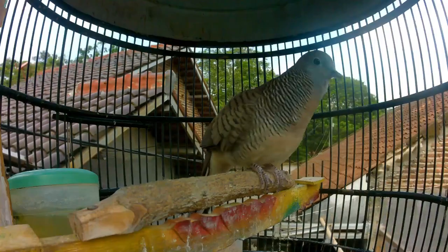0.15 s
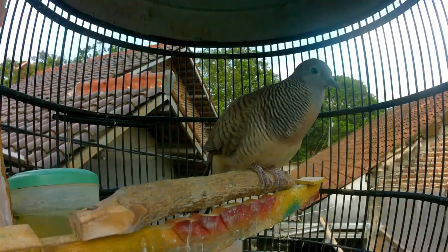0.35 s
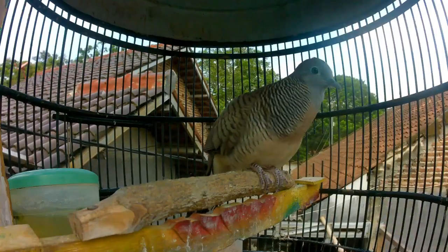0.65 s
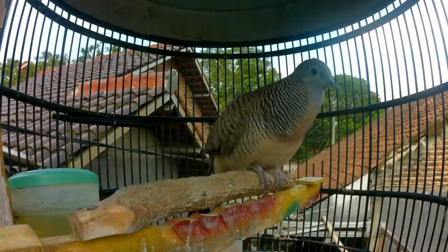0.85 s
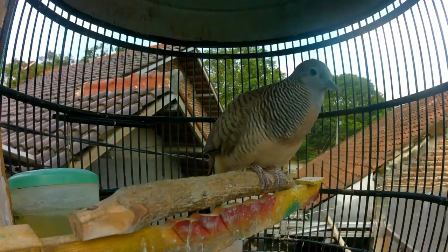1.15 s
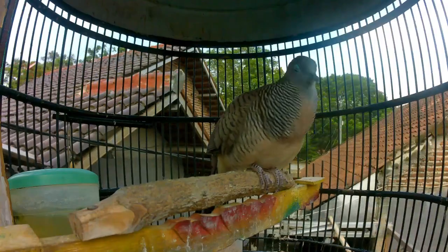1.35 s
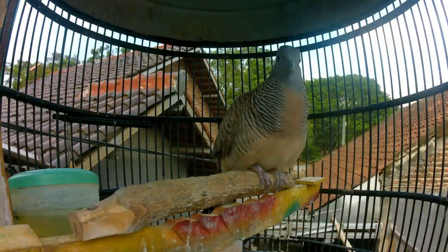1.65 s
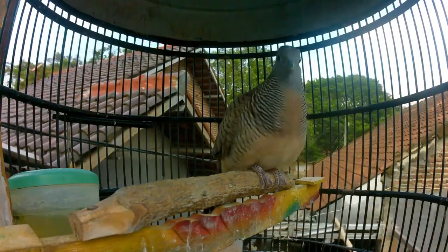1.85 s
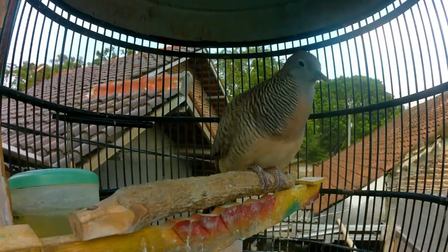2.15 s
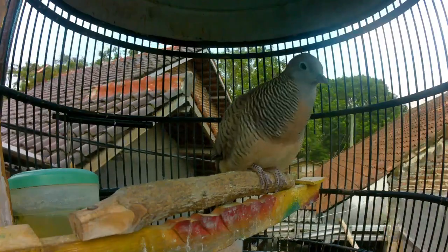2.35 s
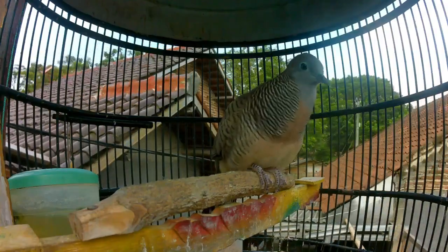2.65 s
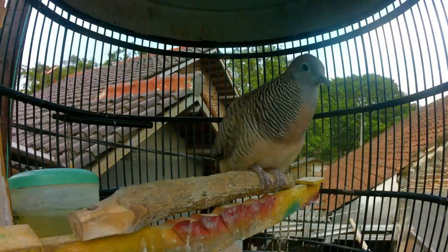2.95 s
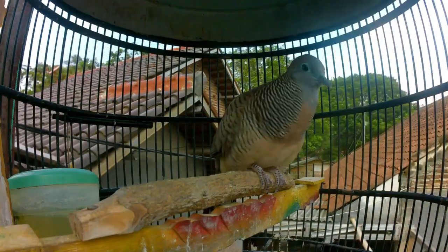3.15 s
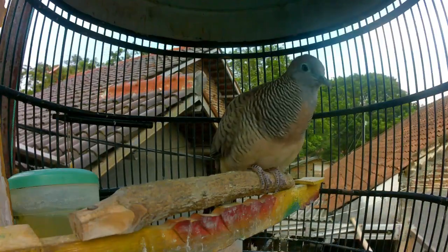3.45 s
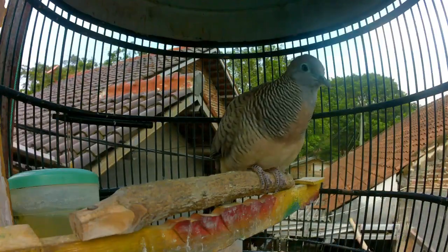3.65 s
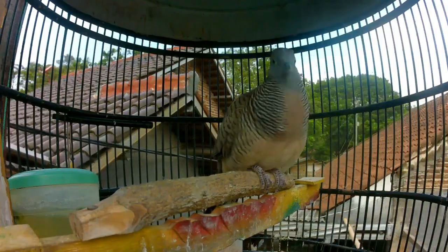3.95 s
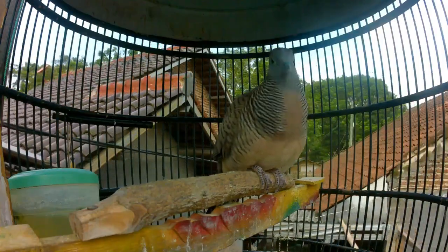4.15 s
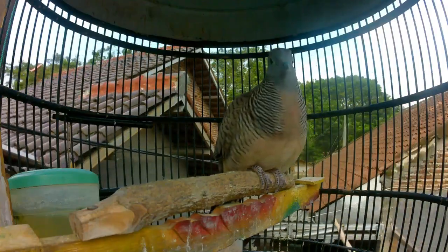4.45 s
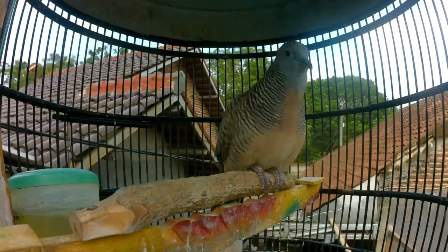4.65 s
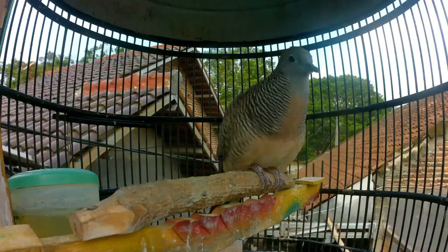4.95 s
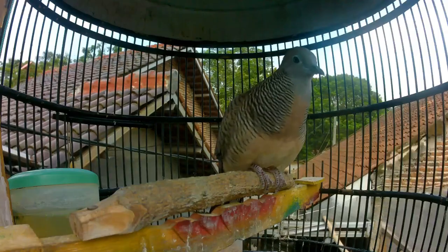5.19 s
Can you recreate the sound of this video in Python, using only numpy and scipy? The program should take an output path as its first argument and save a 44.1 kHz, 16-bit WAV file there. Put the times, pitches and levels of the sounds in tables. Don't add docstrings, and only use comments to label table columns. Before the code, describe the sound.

A small dove coos close to a camera microphone in an open-air cage among roofs. Its voice is a nearly pure, hollow, medium-high whistle, each note sliding quickly upward and rounding off, with a little breathy roughness and soft throat ticks at the onset. At 0.2 seconds the first phrase opens with a rippling trilled note, followed by four rapid staccato pips, then two longer coos, ending near 1.1. After a pause of about a second, a second phrase starts at 2.2: trill, three pips, a shorter coo and two held ones, ending near 3.1. Nearly two seconds of quiet follow. At 4.9 a third phrase begins with its trill and three quick pips, and a final coo is cut short at about 5.3. Very faint, tight echoes trail the notes. Throughout, a low distant motor hum, a thin wavering whine, soft town rumble and slight hiss stay steady underneath.

```python
import sys
import numpy as np
from scipy import signal
from scipy.fft import rfft, irfft
from scipy.io import wavfile

SR = 44100
rng = np.random.default_rng(int(sys.argv[2]) if len(sys.argv) > 2 else 0)


def to_wav(s):
    ch = np.atleast_2d(s).T
    pcm = np.round(np.clip(ch, -1, 1) * 32767)
    wavfile.write(sys.argv[1], SR, pcm.astype(np.int16))


def field_ratio(decibels):
    return 10 ** (np.asarray(decibels, dtype=float) / 20)


N = 234682

# start t/s, upward glide t/s, length t/s, top pitch f/Hz, attack effort level/dB
OPENING_NOTES = [
    (0.2368, 0.05, 0.15, 1357, -12.5),
    (2.167, 0.04, 0.14, 1333, -13),
    (4.9118, .0401, .1352, 1340, -12),
]
STACCATO_NOTES = [
    (0.388, 0.0082, 0.039, 1258, -16),
    (0.4412, 0.01, 0.0363, 1220, -15),
    (0.529, 0.014, 0.0445, 1240, -12),
    (0.6199, 0.02, .0538, 1279, -10.5),
    (2.3034, 0.012, 0.047, 1256, -14),
    (2.3905, 0.012, 0.039, 1225.0, -14),
    (2.4763, .017, .0498, 1270, -12.5),
    (5.0458, 0.0085, 0.045, 1280, -15.5),
    (5.0957, 0.0072, 0.037, 1233, -14),
    (5.1924, 0.013, .0454, 1265, -11),
]
HELD_NOTES = [
    (0.7239, 0.022, 0.11, 1331, -12.5),
    (0.9491, 0.03, 0.11, 1310, -13),
    (2.5708, 0.018, 0.075, 1322, -13),
    (2.718, 0.021, 0.12, 1320, -12.5),
    (2.9486, .030, 0.1234, 1291, -13.5),
    (5.288, 0.015, 0.049, 1308, -10.5),
]
# t/s after glide, depth f/Hz, effort change level/dB
TRILL_DIPS = [
    (.030, 75.0, -4.0),
    (.062, 102.0, -4.0),
    (.093, 65.0, -4.0),
]

# start f/Hz, bend f/Hz, bend share of glide, knee f/Hz, scoop below start f/Hz
GLIDE_LAWS = [(931, 1050, .83, 1257, 400), (660, 973, .38, 1169, 7.9), (621.7, 990, .54, 1205, 13)]
# top share of arch, end f/Hz, fade level/dB, release t/s
ARCH_LAWS = [(.26, 1271, -1.9, 0.0022), (0.12, 1070, -7, 0.0047), (0.46, 1140, -5.5, 0.0048)]
# onset level/dB, share of glide to full effort, settling t/s, greatest accent level/dB over held
ATTACK_LAWS = [(-14, 0.56, .0029, 3), (-7.1, 0.36, 0.0091, 11.0), (-22, 0.21, 0.0048, 4)]
SECOND_DB = (-2, 7.5, 4.5)
GLIDE_SECOND_DB = (11, -1.0, 3.5)
FIFTH_DB = (4.5, 0.0, -1.5)
# t/s from start, peak level/dB
TICKS_BY_KIND = [
    [(-.0365, -42), (-.004, -37), (.002, -33.5)],
    [(-.007, -44), (.001, -39.5)],
    [(-.006, -39), (.0005, -34.5)],
]

# f/Hz, width f/Hz, level/dB
THROAT_MODES = [(967.4, 60.6, 1), (1225, 121, -9.5)]
# multiple of pitch, level/dB, hardly following effort
OVERTONES = [(2, -35), (3, -46), (4, -43), (5, -45), (6, -54)]
# f/Hz, level/dB
BEAK = [(1500, 4), (1950, 1), (2380, -13), (2680, 4), (3300, -8), (3750, 0), (4500, -8), (5250, 1),
        (5900, -6), (6500, 1), (7300, -8), (8000, -2)]
# from t/s, to t/s, throat shift f/Hz, overtone level/dB
POSTURES = [
    (0, 1.6, -5.5, -0.5),
    (1.6, 4, -20, 1.5),
    (4, 6, 3, 1.5),
]
# delay t/s, level/dB
ECHOES = [(.012, -26.5), (.021, -36), (.033, -26.5), (.041, -22.5), (.058, -30.5), (.074, -27.5)]
# f/Hz, rms level/dB
MOTOR_LINES = [(48.4, -66.5), (100, -59.5), (194, -80), (290, -67.5), (387, -76), (548, -76.5), (821, -77),
               (1110, -84), (1499, -69.5), (1523, -67.5), (1582, -73.5), (1785, -98), (1976, -98.5),
               (2163, -84), (2351, -81.5), (2748, -83.5), (2841, -85.5), (5100, -87.5), (5249, -107.5)]
# f/Hz, width f/Hz, rms level/dB
WHINE = [(1512.5, 130, -68.5), (2670, 350, -80.5), (5240, 430, -84.5), (10070, 740, -82)]
# f/Hz, level/dB per Hz
TOWN_SPECTRUM = [(12, -5), (30, 2.5), (50, 3), (80, -1.5), (200, 0), (310, -4), (420, -8.5), (900, -9.5),
                 (1300, -16), (1800, -17), (2500, -24), (3200, -26.5), (6500, -29.5), (15000, -29)]

KINDS = (OPENING_NOTES, STACCATO_NOTES, HELD_NOTES)
ACCENT_DB_PER_S, ACCENT_FROM_S = 901, 0.0078
TICK_SPREAD_DB = 1.5
TOWN_DB = -53.5
TOP_CUT_HZ, LAST_FADE_S, OFFSET = 15720, .0015, -.0119


def dove():
    tone, rasp, airflow, overtones = syrinx(flutter_hz=6.0, shimmer_db=.45, rasp_db=-11.5, patchy_db=2.5)
    ticks = throat_ticks()
    drive = tone + rasp + ticks + field_ratio(-27.0) * airflow
    t = np.arange(N) / SR
    throat = np.zeros(N)
    for start_s, end_s, shift_hz, open_db in POSTURES:
        inside = (t >= start_s) & (t < end_s)
        overtones = overtones * np.where(inside, field_ratio(open_db), 1)
        for hz, width_hz, db in THROAT_MODES:
            throat += field_ratio(db) * resonance(drive * inside, hz + shift_hz, width_hz)
    puff = resonance(resonance(rasp + field_ratio(-8.5) * tone, 667, 300), 610, 300)
    breath = resonance(airflow, 1850, 500)
    rough = resonance(resonance(rasp, 1400, 600), 1400, 600)
    knock = resonance(resonance(ticks, 860, 280), 860, 280)
    hiss = field_ratio(-43.0) * breath + field_ratio(-20.0) * rough
    return field_ratio(0.6) * throat + field_ratio(-5.5) * puff + hiss + field_ratio(-9.0) * knock + overtones


def syrinx(flutter_hz, shimmer_db, rasp_db, patchy_db):
    tone, rasp, airflow, overtones = np.zeros((4, N))
    flutter = flutter_hz * drift(90)
    shimmer = shimmer_db * drift(70)
    air = rms_one(dull(rng.standard_normal(N), 1800))
    patches = [patchy_db * drift(25) for _ in OVERTONES]
    for rows, second_db, lift_db, fifth_db, *laws in zip(
            KINDS, SECOND_DB, GLIDE_SECOND_DB, FIFTH_DB, GLIDE_LAWS, ARCH_LAWS, ATTACK_LAWS):
        for row in rows:
            start_s, glide_s, length_s, top_hz, _ = row
            span = slice(int(start_s * SR), min(int((start_s + length_s) * SR), N))
            t = np.arange(N)[span] / SR
            hz, effort_db, gate, held_db = note(row, *laws, t)
            phase = 2 * np.pi * np.cumsum(hz + flutter[span]) / SR
            tone[span] += gate * field_ratio(effort_db + shimmer[span]) * np.sin(phase)
            airflow[span] += gate * field_ratio(held_db) * air[span]

            unsteady = np.exp(-(t - start_s) / (.55 * glide_s)) * np.clip((t - start_s) / .004, 0, 1)
            rasp[span] += gate * field_ratio(held_db + rasp_db) * unsteady * air[span]

            below_top = hz / top_hz - 1
            common_db = -23.0 + 0.11 * (effort_db - held_db) + 35.0 * np.clip(below_top, -.1, 0)
            for (k, db), patch in zip(OVERTONES, patches):
                level_db = common_db + held_db * 0 + db + on_log(BEAK, k * hz) + patch[span]
                level_db = level_db + 30.0 * (k - 2) * below_top
                if k == 2:
                    level_db = level_db + second_db + lift_db * (t < start_s + .8 * glide_s)
                if k == 5:
                    level_db = level_db + fifth_db
                overtones[span] += gate * field_ratio(level_db) * np.sin(k * phase)
    return tone, rasp, airflow, overtones


def note(row, glide_law, arch_law, attack_law, t):
    start_s, glide_s, length_s, top_hz, attack_db = row
    start_hz, bend_hz, bend, knee_hz, scoop_hz = glide_law
    crest, end_hz, fade_db, release_s = arch_law
    onset_db, swell, settle_s, accent_db = attack_law
    knee_s, end_s = start_s + glide_s, start_s + length_s
    held_db = attack_db - np.clip(ACCENT_DB_PER_S * (glide_s - ACCENT_FROM_S), 0, accent_db)

    glide = np.interp(t, [start_s, start_s + bend * glide_s, knee_s], [start_hz, bend_hz, knee_hz])
    glide = glide - scoop_hz * np.exp(-(t - start_s) / (0.19 * glide_s))
    u = np.clip((t - knee_s) / (end_s - knee_s), 0, 1)
    climb = (top_hz - knee_hz) * np.clip(1 - u / crest, 0, 1) ** 2
    fall = (top_hz - end_hz) * np.clip((u - crest) / (1 - crest), 0, 1) ** 2.4
    hz = np.where(t < knee_s, glide, top_hz - climb - fall)

    effort_db = np.interp(t, [start_s, start_s + swell * glide_s, knee_s, knee_s + settle_s, end_s],
                          [attack_db + onset_db, attack_db, attack_db, held_db, held_db + fade_db])
    for opening in OPENING_NOTES:
        for after_s, depth_hz, change_db in TRILL_DIPS:
            dip = np.exp(-.5 * ((t - opening[0] - opening[1] - after_s) / .0063) ** 2)
            hz = hz - depth_hz * dip
            effort_db = effort_db + change_db * dip
    gate = np.clip((t - start_s) / .002, 0, 1) * np.clip((end_s - t) / release_s, 0, 1)
    return hz, effort_db, gate, held_db


def throat_ticks():
    ticks = np.zeros(N)
    for rows, run in zip(KINDS, TICKS_BY_KIND):
        for row in rows:
            for lead_s, db in run:
                peak_db = db + 41.5 + TICK_SPREAD_DB * rng.standard_normal()
                ticks[int((row[0] + lead_s) * SR)] = field_ratio(peak_db)
    return dull(ticks, 1150)


def roofs(x):
    out = np.zeros(N)
    for k, (delay_s, db) in enumerate(ECHOES):
        lag = int(delay_s * SR)
        out[lag:] += (-1) ** k * field_ratio(db - 1.5) * x[:N - lag]
    return resonance(out, 1228, 460)


def motor(waver_db, wander):
    speed = np.cumsum(1 + wander * drift(1.74)) / SR
    out = np.zeros(N)
    for hz, db in MOTOR_LINES:
        level = field_ratio(db + waver_db * drift(1.9)) * np.sqrt(2)
        out += level * np.sin(2 * np.pi * (hz * speed + rng.random()))
    air = rng.standard_normal(N)
    for hz, width_hz, db in WHINE:
        out += field_ratio(db) * rms_one(resonance(resonance(air, hz, width_hz), hz, width_hz))
    return out


def town(swell_db):
    hz = np.fft.rfftfreq(N, 1 / SR) + 1
    colour = field_ratio(on_log(TOWN_SPECTRUM, hz)) * rfft(rng.standard_normal(N))
    low = 1 / (1 + (hz / 2500) ** 2)
    rumble = field_ratio(swell_db * drift(0.15)) * irfft(colour * low, N)
    hiss = irfft(colour * (1 - low), N)
    return field_ratio(TOWN_DB) * rms_one(rumble + hiss)


def rms_one(x):
    return x / np.sqrt(np.mean(x ** 2) + 1e-20)


def drift(rate_hz):
    r = np.exp(-2 * np.pi * rate_hz / SR)
    slow = signal.lfilter([1], [1, -2 * r, r * r], rng.standard_normal(N + SR))
    return rms_one(slow[SR:])


def resonance(x, hz, width_hz):
    r = np.exp(-np.pi * width_hz / SR)
    zeros = [(1 - r * r) / 2, 0, (r * r - 1) / 2]
    poles = [1, -2 * r * np.cos(2 * np.pi * hz / SR), r * r]
    return signal.lfilter(zeros, poles, x + 1e-18)


def dull(x, hz):
    return signal.sosfilt(signal.butter(6, hz, fs=SR, output="sos"), x + 1e-18)


def on_log(points, hz):
    table_hz, table_db = np.transpose(points)
    return np.interp(np.log(hz), np.log(table_hz), table_db)


def scene():
    bird = dove()
    return (bird + roofs(bird) + motor(waver_db=2.5, wander=0.001455) + town(swell_db=.45))[None]


def top_cut(x):
    return signal.sosfilt(signal.butter(12, 16650, fs=SR, output="sos"), x)


def record(dry):
    cut = signal.sosfilt(signal.ellip(14, .3, 60, TOP_CUT_HZ, fs=SR, output="sos"), dry)
    left_s = (N - np.arange(N)) / SR
    stop = np.sin(np.pi / 2 * np.clip(left_s / LAST_FADE_S, 0, 1)) ** 2
    return top_cut((cut + OFFSET) * stop)


dry = scene()
out = record(dry)
to_wav(out)
```